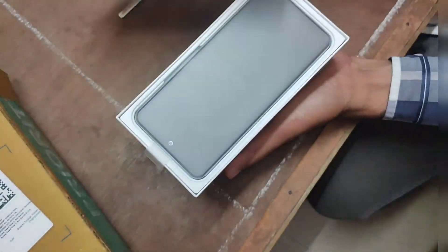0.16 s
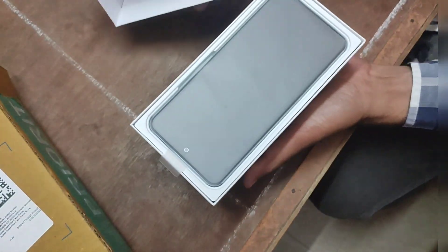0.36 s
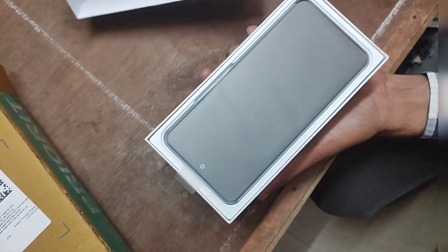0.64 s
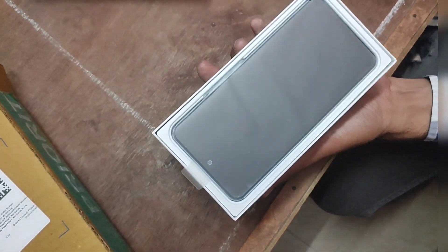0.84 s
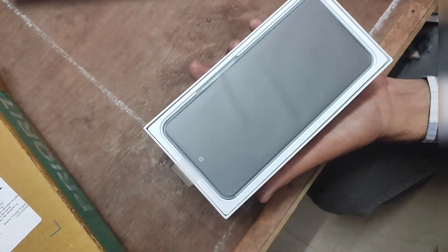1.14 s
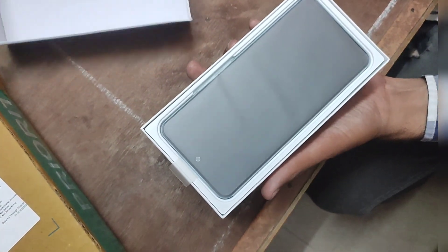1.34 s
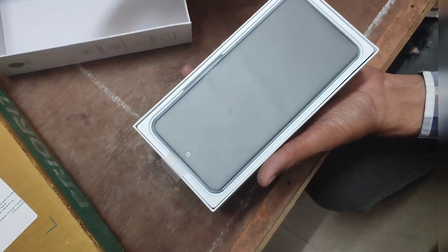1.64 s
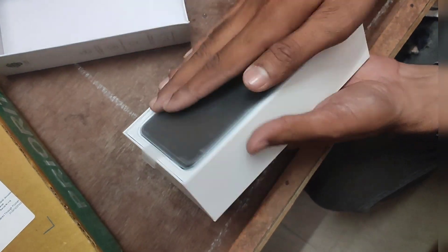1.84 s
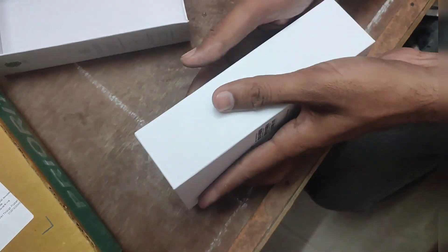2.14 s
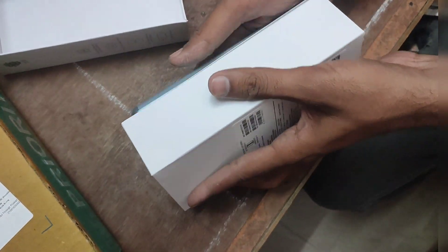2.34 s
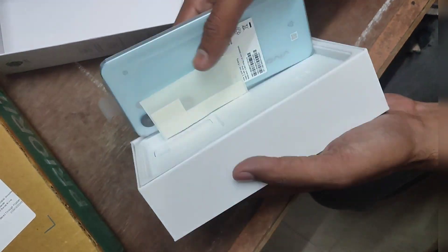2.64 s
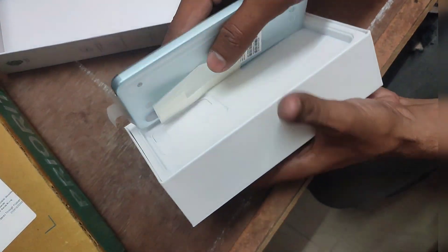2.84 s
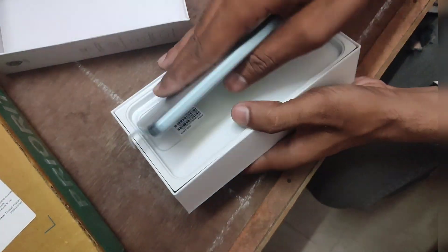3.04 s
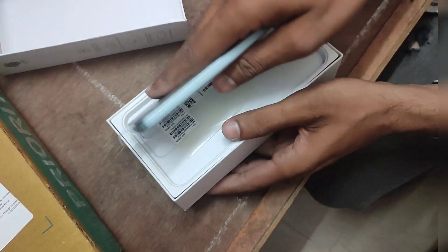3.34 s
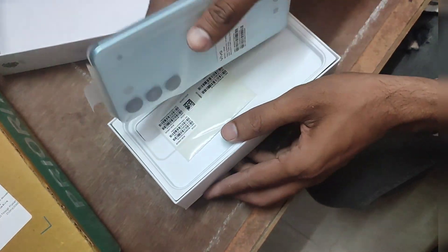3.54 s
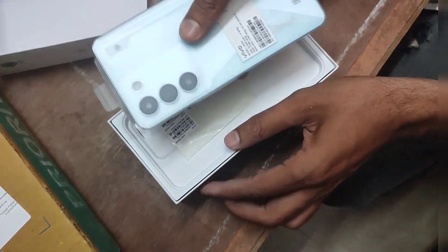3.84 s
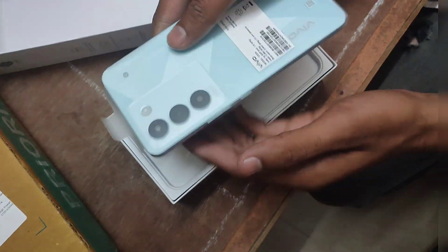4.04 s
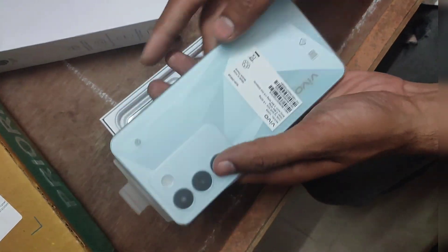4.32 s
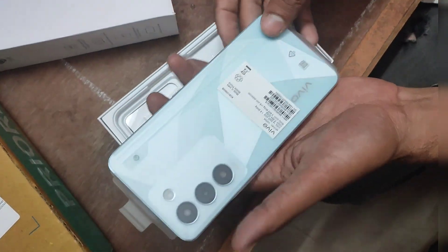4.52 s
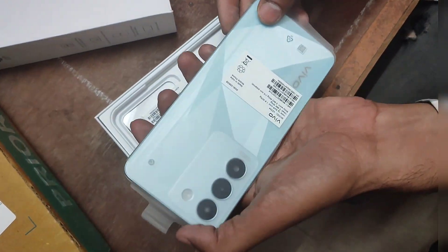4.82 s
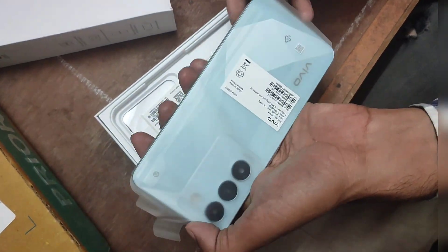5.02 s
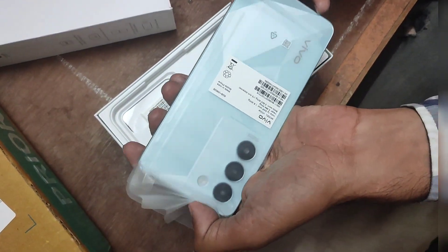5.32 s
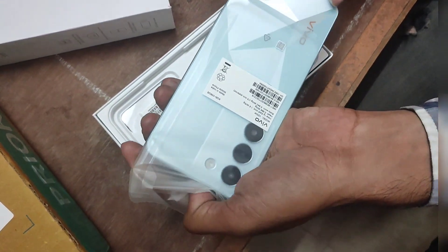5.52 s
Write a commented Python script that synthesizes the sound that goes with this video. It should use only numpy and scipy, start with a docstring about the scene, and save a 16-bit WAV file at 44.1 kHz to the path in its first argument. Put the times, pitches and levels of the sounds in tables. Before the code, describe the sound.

Juddering cardboard drag, loud hollow knocks, a quiet spell, then light box thuds and sharp film crackling, in a softly humming room.

```python
"""A lid drags and judders over a wooden table and is knocked down, a cardboard box and its tray bump, and thin
plastic film around a handset rustles and snaps, close by in a softly humming room. Cardboard and table are
banks of damped sines, struck by short pushes or jerked by random slips; snaps are filtered clicks; rubs, hiss
and hum are shaped noise. Decaying noise bands form the room; two microphone ports differ in colour."""
import sys
import numpy as np
from scipy import signal
from scipy.fft import rfft, irfft, next_fast_len
from scipy.io import wavfile
from scipy.ndimage import uniform_filter1d

SR = 44100
rng = np.random.default_rng(int(sys.argv[2]) if len(sys.argv) > 2 else 0)


def pcm_store(signal):
    """Save signal as 16-bit PCM."""
    levels = np.round(np.clip(np.atleast_2d(signal), -1, 1) * 32767)
    wavfile.write(sys.argv[1], SR, levels.astype(np.int16).T)


N = 250223

# Modes of the cardboard panels. Each row: frequency in Hz, gain in dB, t60 in s at damp 1.
BOARD = [(188, -25, 0.4), (251.3, 1, 0.13), (279.5, 7, 0.035), (334, -2, 0.17), (429, 2.5, 0.11),
         (486, -6, 0.27), (576, 8.5, 0.035), (650, 0, 0.065), (781, 1.5, 0.057), (916, 7, 0.037),
         (1025, -11.5, 0.26), (1151, 2, 0.078), (1250, -0.5, 0.059), (1421, -6, 0.11), (2000, -5, 0.085)]
# Modes of the wooden table top. Each row: frequency in Hz, gain in dB, t60 in s at damp 1.
TABLE = [(74.2, 2, 0.2), (111.5, -7, 0.28), (133, 2, 0.078), (162, 3.5, 0.14)]


def undb(db):
    """Decibels to amplitude."""
    return 10 ** (np.asarray(db) / 20)


def unit(x):
    """Scales to RMS 1 over all channels."""
    return x / np.sqrt(np.mean(x ** 2))


def decay(t_s, t60_s):
    """Exponential fall of 60 dB in t60_s."""
    return np.exp(-np.log(1000) * t_s / t60_s)


def along(points, hz):
    """Reads (Hz, value) points on a log-frequency axis."""
    f, v = np.transpose(points)
    return np.interp(np.log(np.maximum(hz, 1)), np.log(f), v)


def colour(x, points):
    """Filters by a spectrum of (Hz, dB) points."""
    n = next_fast_len(x.shape[-1])
    bins_hz = np.arange(n // 2 + 1) * SR / n
    return irfft(rfft(x, n) * undb(along(points, bins_hz)), n)[..., :x.shape[-1]]


def bandpass(x, hz, width_hz, lowest_hz=100):
    """Band around a centre, edges kept inside the usable range."""
    edges_hz = np.clip([hz - width_hz / 2, hz + width_hz / 2], lowest_hz, SR / 2.2)
    return signal.sosfilt(signal.butter(2, edges_hz, "band", fs=SR, output="sos"), x)


def likeness(pair, hz):
    """Two noises become left and right that share the bass below hz."""
    mid, side = pair
    side = signal.sosfilt(signal.butter(2, hz, "high", fs=SR, output="sos"), side)
    return np.array([mid + side, mid - side])


def curve(table, column):
    """A control column over time, holding its end values."""
    rows = np.array(table)
    return np.interp(np.arange(N) / SR, rows[:, 0], rows[:, column])


def during(table):
    """1 between the first and last time of a table, else 0."""
    t = np.arange(N) / SR
    return (t >= table[0][0]) & (t <= table[-1][0])


def hump(start_s, length_s):
    """A smooth swell from 0 to 1 and back."""
    return np.sin(np.pi * np.clip((np.arange(N) / SR - start_s) / length_s, 0, 1))


def walk(rate_hz):
    """Random levels at a given rate, joined by slews; RMS 1."""
    k = int(SR / rate_hz)
    steps = np.repeat(rng.standard_normal(N // k + 1), k)
    return unit(uniform_filter1d(steps, k)[:N])


def add(out, start_s, sound, pan_db):
    """Mixes a sound in at a time; pan_db is left minus right."""
    i = int(start_s * SR)
    out[:, i:i + sound.shape[-1]] += undb([[pan_db / 2], [-pan_db / 2]]) * sound[..., :N - i]


def ring(modes, lift_db=0, damp=1):
    """Damped sines of a struck body; successive groups of three modes start in opposite senses."""
    hz, db, t60_s = np.transpose(modes)[:, :, None]
    t = np.arange(SR // 4) / SR
    sense = -(-1) ** (np.arange(len(hz))[:, None] // 3)
    modes_out = sense * undb(db + lift_db) * decay(t, t60_s * damp) * np.sin(2 * np.pi * hz * t)
    return np.sum(modes_out, axis=0)


def burst(hz, width_hz, t60_s):
    """Dying noise around a centre, scaled by its energy and ring time."""
    t = np.arange(4096) / SR
    noise = likeness(rng.standard_normal((2, len(t))), 1500)
    x = bandpass(noise * decay(t, t60_s), hz, width_hz)
    return x / np.sqrt(np.sum(x[0] ** 2) / (t60_s * SR / 25 + 1))


def click(hz, width_hz):
    """A single sharp buckle and a few weaker ones within three milliseconds, peak 1."""
    steps = np.zeros(512)
    steps[0] = 1
    steps[rng.integers(8, 130, size=5)] = .11 * rng.standard_normal(size=5)
    x = bandpass(steps, hz, width_hz)
    return x / np.abs(x).max()


def crackle():
    """Noise made of 0.9 ms grains of very uneven size."""
    grains_db = 2.4 * rng.exponential(size=N // 40 + 1).repeat(40)[:N]
    return rng.standard_normal((2, N)) * undb(grains_db + 2.5 * walk(60))


def air():
    """Soft room hum: coloured noise whose level wavers slowly."""
    # Each row: frequency in Hz, spectrum in dB.
    air_spectrum = [(12, -3.5), (20, 1.5), (103, -3), (126, -8.5), (324, -9), (519, -9), (746, -17.5),
                    (906, -17), (1070, -18.5), (2330, -22.5), (4070, -29.5), (11000, -50.5), (14200, -57),
                    (15100, -75)]
    level_db = -50.5 + 0.83 * walk(3.35)
    return undb(level_db) * unit(colour(likeness(rng.standard_normal((2, N)), 710), air_spectrum))


def room(x):
    """Dense echoes whose level and decay time vary with frequency, as decaying noise bands."""
    # Each row: band centre in Hz, t60 in s, level in dB.
    room_bands = [(98, 0.94, -1), (240, 0.51, -7), (505, 0.51, -3), (1010, 0.65, -9), (2030, 0.68, -11.5),
                  (4200, 0.82, -14), (6200, 0.76, -12), (8400, 0.24, -11.5), (11800, 0.25, -16)]
    early_db, early_t60_s, first_echo_s = 4.5, 0.089, 0.0048
    t = np.arange(SR // 2) / SR
    centres_hz, t60s_s, levels_db = np.transpose(room_bands)
    tail = 0
    for hz in 63 * 2. ** np.arange(0, 8.1, .5):
        band = signal.butter(1, [hz / 1.19, hz * 1.19], "band", fs=SR, output="sos")
        t60_s, db = (np.interp(np.log(hz), np.log(centres_hz), c) for c in (t60s_s, levels_db))
        fade = decay(t, t60_s) / np.sqrt(t60_s * SR / 14)
        noise = likeness(rng.standard_normal((2, len(t))), 900)
        tail = tail + undb(db) * fade * signal.sosfilt(band, noise)
    # the nearest surfaces answer louder and briefly
    early = 1 + undb(early_db) * decay(t, early_t60_s)
    onset = np.clip(t / first_echo_s - 1, 0, 1)
    return signal.fftconvolve(tail * early * onset, x.mean(axis=0)[None], axes=1)[:, :N]


def whistle():
    """A faint narrow band of hiss swells and fades."""
    start_s, length_s, level_db, centre_hz, width_hz = 0.26, 0.31, -56, 1820, 270
    hiss = unit(bandpass(rng.standard_normal((2, N)), centre_hz, width_hz))
    return undb(level_db) * hump(start_s, length_s) ** .5 * hiss


def scuffs():
    """Short rubs of a finger on film or card: grainy noise, quick to rise, slower to fade as the finger lifts."""
    # Each row: start in seconds, length in s, level in dB, centre in Hz, band width re centre.
    rubs = [(0.407, 0.13, -59, 5130, 2.2), (1.116, 0.01, -36.5, 3260, 0.53),
            (1.128, 0.093, -46.5, 3100, 0.32), (2.635, 0.085, -46, 3570, 2),
            (2.742, 0.029, -47.5, 3300, 1.3), (2.953, 0.038, -50, 3150, 0.23),
            (2.946, 0.11, -48, 5600, 0.86), (3.223, 0.021, -55, 4930, 1.2), (3.816, 0.015, -38, 5240, 0.85),
            (4.105, 0.023, -41.5, 4150, 0.66), (4.106, 0.084, -50.5, 3040, 0.18),
            (4.496, 0.12, -52, 3540, 1.6), (4.844, 0.09, -54, 6860, 0.49), (5.337, 0.037, -40, 5900, 1.06),
            (5.393, 0.12, -45.5, 5500, 1.47), (5.473, 0.11, -40.5, 4670, 0.92),
            (5.583, 0.14, -50.5, 4800, 1.4)]
    out, grains = np.zeros((2, N)), crackle()
    for start_s, length_s, db, hz, width in rubs:
        i, n = int(start_s * SR), int(length_s * SR)
        rub = unit(bandpass(grains[:, i:i + n], hz, hz * width, lowest_hz=200))
        envelope = np.sin(np.pi * np.linspace(0, 1, rub.shape[1]) ** 0.32) ** 0.79
        out[:, i:i + n] += undb(db) * rub * envelope
    return out


def judders():
    """The rim catches and a panel drones: brief sines of wavering pitch and flickering level."""
    # Each row: start in seconds, length in s, gain in dB, centre in Hz.
    catches = [(0.602, 0.03, -39, 250), (.685, .08, -40, 262), (.68, .11, -40, 590),
               (0.803, 0.042, -35, 250), (0.965, 0.025, -41, 220)]
    waver, flicker_db = 0.101, 3  # RMS spread: pitch re centre, level
    booms = 0
    for start_s, length_s, db, hz in catches:
        pitch_hz = hz * (1 + waver * walk(hz / 8))
        drone = np.sin(2 * np.pi * np.cumsum(pitch_hz) / SR)
        booms = booms + 2 * undb(db + flicker_db * walk(70)) * hump(start_s, length_s) * drone
    return booms


def drag():
    """Fibres catch and slip in uneven jerks that shake lid and table; the finest ones only hiss."""
    # Lid dragged over the table. Each row: time in seconds, rubbing in dB, hiss re rubbing in dB, table rumble in dB.
    lid_drag = [(.52, -64, 4, -77), (.56, -47, -10, -50), (.6, -50, 1.5, -33.5), (.66, -42.5, -6, -58),
                (.71, -39, -1.5, -50), (.78, -35.5, -1.5, -57), (.85, -48.5, 9.5, -50),
                (.91, -44.5, 4, -45), (.98, -41.5, 4.5, -35.5), (1.05, -51.5, 5, -55), (1.11, -61, 2, -41),
                (1.118, -35, -6, -40), (1.16, -45, -5.5, -44), (1.29, -68.5, 7.5, -79)]
    # Rubbing hiss. Each row: frequency in Hz, spectrum in dB.
    hiss_spectrum = [(710, -11.5), (1200, -10), (1730, -10.5), (2770, -11.5), (6870, -24.5), (8330, -29.5),
                     (13600, -43), (15500, -60)]
    slips_per_s, panel_db = 900, -3  # panel: low board modes re the rest
    slips = (rng.random(N) < slips_per_s / SR) * rng.standard_normal(N) * undb(1.85 * walk(44.82))
    panel, walls, table = (unit(signal.fftconvolve(slips, ring(modes, damp=0.44))[:N])
                           for modes in (BOARD[1:4], BOARD[4:], TABLE))
    hiss = unit(colour(rng.standard_normal((2, N)) * undb(1.45 * walk(90.7)), hiss_spectrum))
    rubbing = walls + undb(panel_db) * panel + undb(curve(lid_drag, 2)) * hiss
    lid = undb(curve(lid_drag, 1)) * rubbing
    return during(lid_drag) * (lid + judders() + undb(curve(lid_drag, 3)) * table)


def film():
    """Creases in the film buckle with a snap; between them many tiny ones crackle."""
    # Snaps. Each row: start in seconds, click level in dB, centre in Hz, left minus right in dB.
    snaps = [(2.433, -34.5, 3900, -2.5), (2.637, -31, 3770, -2), (2.681, -32, 5230, 3),
             (2.653, -22.5, 3750, 8), (2.6937, -29, 4160, -1), (2.751, -45, 2570, 5), (2.858, -34, 2400, 4),
             (2.9744, -21, 5350, 0.5), (3.0894, -30.5, 3200, 3), (3.2297, -35, 2120, 4),
             (4.0262, -42.5, 3220, -11), (4.374, -47.5, 3140, -27), (4.504, -33.5, 4360, -7),
             (4.5127, -35, 2680, -13), (4.551, -42, 2900, -5), (4.561, -33, 2790, -7),
             (4.5765, -29.5, 2570, -2), (4.7246, -28, 5330, 0), (4.835, -38, 5744, -5),
             (4.8646, -34, 6600, 0), (4.8996, -35.5, 2540, -1), (4.914, -33.5, 5960, 5),
             (4.995, -25.5, 5700, 3), (5.059, -17.5, 5530, 4.5), (5.126, -15, 5840, -16),
             (5.2547, -31.5, 2280, 5), (5.2672, -39.5, 4570, -14), (5.3344, -22.5, 5660, 3),
             (5.3826, -17, 4900, 4.5), (5.402, -21.5, 3200, -3.5), (5.46, -28, 5570, -5),
             (5.4786, -12.5, 4160, -1.5), (5.5103, -11.5, 4640, 0.5), (5.524, -18, 5756, 0),
             (5.609, -22.5, 4741, 1), (5.6346, -21.5, 4400, -7), (5.6385, -18, 5360, -5),
             (5.6416, -20, 3750, -2), (5.643, -17, 4470, -5.5)]
    # Film creeping in the hands. Each row: time in seconds, level in dB.
    rustle = [(2.6, -74), (2.85, -69.5), (3.16, -67), (3.56, -71.5), (4.09, -66), (4.66, -66), (4.9, -69),
              (5.4, -70), (5.51, -48.5), (5.67, -69)]
    # Each row: frequency in Hz, spectrum in dB.
    film_spectrum = [(1000, -26), (2000, -26), (4000, -15), (6500, 10.5), (9000, 5.5), (12000, 4.5),
                     (14300, -0.5), (15200, -25)]
    sharper_db_per_db = 0.73  # louder snaps are wider in spectrum
    sizzle_db, sizzle_t60_s = -16, 0.015  # the crease fizzes briefly after
    lifted_s, over_tray_db, in_hand_db = 4.2, -8, -23.5  # low knock re snap: film on tray, handset lifted clear
    out = np.zeros((2, N))
    for start_s, db, hz, pan_db in snaps:
        snap = click(hz, 1.025 * hz) + undb(sharper_db_per_db * db) * click(6700, 17000)
        add(out, start_s, undb(db) * snap, pan_db)
        add(out, start_s, undb(db + sizzle_db) * burst(1.24 * hz, 1.13 * hz, sizzle_t60_s), pan_db)
        knock_db = over_tray_db if start_s < lifted_s else in_hand_db
        add(out, start_s, undb(db + knock_db) * burst(1160, 860, 0.014), pan_db)
    return out + unit(colour(crackle(), film_spectrum)) * undb(curve(rustle, 1))


def knocks():
    """Each blow rings the board modes near its centre and the table under it; a dry clack marks the contact."""
    # Cardboard blows. Each row: start in seconds, board peak in dB, centre of the ringing modes in Hz,
    # ring time re modes, table gain re board in dB, clack gain re board in dB,
    # fall-off of modes from the centre in dB per octave squared, pitch re modes, centre of the table thump in Hz.
    blows = [(.351, -23, 1130, 0.38, -37, -29, 8, 1.14, 121),
             (1.3277, -19.5, 420, 1.1, -3, -26, 5.5, 0.84, 152),
             (1.3667, -4.5, 520, 0.69, -35, -16, -0.5, 1, 120),
             (1.3716, -8.5, 303, 0.66, -44, -33, 4, 1.11, 119),
             (1.397, -19.5, 524, 1.1, -22, -13, 9, 1.02, 120),
             (1.416, -15, 430, 2.5, -8, -20.5, 0.5, 1.08, 129),
             (1.512, -9, 420, 0.35, -36, -29, 3, 1.09, 130), (1.517, -8, 248, 1.24, -11, -24.5, 7, 1, 142),
             (2.525, -54.5, 230, 0.69, 13.5, -23, 0, 1.2, 85),
             (2.635, -39, 580, 2.7, -17, -6, 8, 1.15, 110),
             (2.680, -27.5, 1090, 0.42, -19, -31, 3, 1.12, 110),
             (2.818, -41.5, 200, 0.51, 3, -28, 1, 1.1, 109),
             (2.864, -33, 620, 0.59, -10, -13, 8, 1.02, 110),
             (2.977, -30.5, 785, 0.35, -37, -15, 2.5, 1.21, 110),
             (3.048, -37, 514, 1.7, -9.5, -25, 4, 1.04, 111), (3.189, -16, 660, 0.5, -30, -24, 3, 1.1, 80),
             (3.194, -23.5, 430, 0.7, -33, -13, 12, 0.92, 100.4),
             (3.199, -25.5, 270, 1.3, -30, -35, 8, 1.1, 100),
             (3.207, -33, 650, 0.32, -17, -20, -1, 1.1, 100), (3.243, -32, 550, 1, -34, -15, 1, 0.95, 100),
             (3.362, -42, 557, 0.33, -17, -15, 14, 0.86, 100),
             (3.38, -38, 450, 0.38, -23, -10.5, 14, 1.03, 99),
             (3.773, -29, 483, 1.2, -25, -25, 9, 1.07, 100),
             (3.794, -13, 493, 0.72, -6, -22, 2, 1.09, 71.5),
             (3.803, -19, 650, 0.51, -3, -15, 2.5, 0.85, 75),
             (3.818, -18.5, 298, 0.69, -8, -32, 11, 0.9, 90),
             (3.838, -27.5, 328, 1.1, -5, -25, 5, 1.12, 80), (4.106, -32, 477, 0.21, -19, -3, 4, 1.1, 90),
             (4.115, -28, 650, 0.45, -10.5, -25, -3, 0.99, 99.7),
             (5.123, -31, 1110, 0.068, -27, -29, 4.5, 0.95, 110),
             (5.641, -30, 717, 0.39, -23, -6.5, 3, 1.16, 110)]
    crack_db, crack_hz = -1, 3700  # first instant of contact, re clack
    push_cycles = .18  # contact time in cycles of the centre: deep blows are soft
    to_walls_ring = 0.44  # ring time as the walls receive it, many modes blending
    pan_db = -0.5  # left minus right
    out, far = np.zeros((2, 2, N))
    board_hz, table_hz = np.array(BOARD)[:, :1], np.array(TABLE)[:, :1]
    swell = 1 - np.exp(-np.arange(SR // 4) / SR / 0.019)  # the heavy table takes a moment to move
    for start_s, db, hz, damp, thump_db, clack_db, focus_db, pitch, thump_hz in blows:
        scatter = rng.standard_normal((2, len(BOARD), 1))
        grip = pitch * (1 + .012 * scatter[0])  # grip shifts each panel a little
        held = np.array(BOARD) * np.hstack([grip, np.ones((len(BOARD), 2))])
        lift_db = 1.5 * scatter[1] - focus_db * np.log2(board_hz / hz) ** 2
        clack = burst(1970, 1520, 0.2 * damp) + undb(-12.5) * burst(4600, 4700, 0.26 * damp)
        clack = clack + undb(crack_db) * burst(crack_hz, 1.03 * crack_hz, 0.015)
        push = np.hanning(int(push_cycles * SR / hz) + 3)
        for mix, ringing in ((out, 1), (far, to_walls_ring)):
            board = signal.fftconvolve(ring(held, lift_db, damp * ringing), push)[:SR // 4]
            board = board / np.abs(board).max()
            table = swell * ring(TABLE, -7 * np.log2(table_hz / thump_hz) ** 2, ringing)
            add(mix, start_s, undb(db) * (board + undb(thump_db) * table), pan_db)
            add(mix, start_s, undb(db + clack_db) * clack, pan_db)
    return out, far


def scene():
    """Direct sound, the room's answer and the hum, at the two ports."""
    right_lag_s = 0.00018  # sound reaches the left port first
    blows, blows_to_walls = knocks()
    small = drag() + film() + scuffs() + whistle()
    cut = signal.butter(4, 55, "high", fs=SR, output="sos")  # small bodies radiate no deep bass
    near, far = signal.sosfilt(cut, [blows + small, blows_to_walls + small])
    heard = np.array([near[0], np.roll(near[1], int(right_lag_s * SR))])
    return heard + room(far) + air()


def record(dry):
    """Each port has its own colour; the whole sound is dull above 15 kHz and its top is cut steeply."""
    # Left minus right port. Each row: frequency in Hz, difference in dB.
    port_difference = [(100, 2.9), (400, 0.4), (900, -1.2), (1500, -2), (2500, -9.5), (4500, -9),
                       (6500, -8), (8500, 2.5), (12000, 1.5)]
    # Treble of the whole sound, dull above 15 kHz. Each row: frequency in Hz, gain in dB.
    top_treble = [(7000, -0.5), (9800, -2.5), (12500, 2.5), (14300, 4), (15200, -14), (16200, -16)]
    top_hz = 16200
    left = colour(dry[0], [(f, db / 2) for f, db in port_difference])
    right = colour(dry[1], [(f, -db / 2) for f, db in port_difference])
    top_cut = signal.ellip(8, .2, 70, top_hz, fs=SR, output="sos")
    return signal.sosfilt(top_cut, colour(np.array([left, right]), top_treble))


dry = scene()
out = record(dry)
pcm_store(out)
```